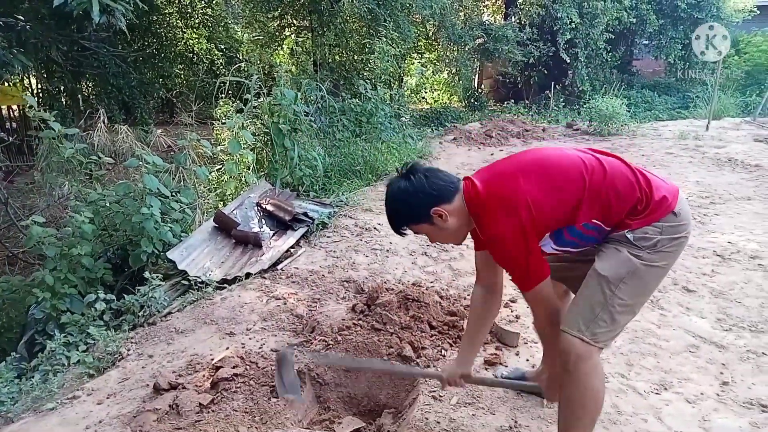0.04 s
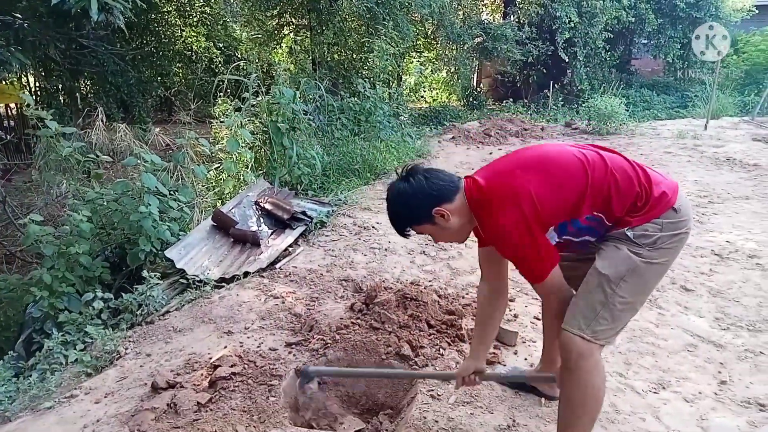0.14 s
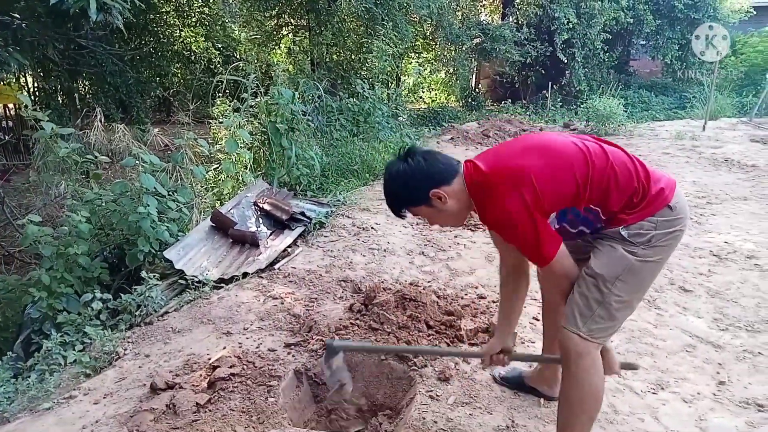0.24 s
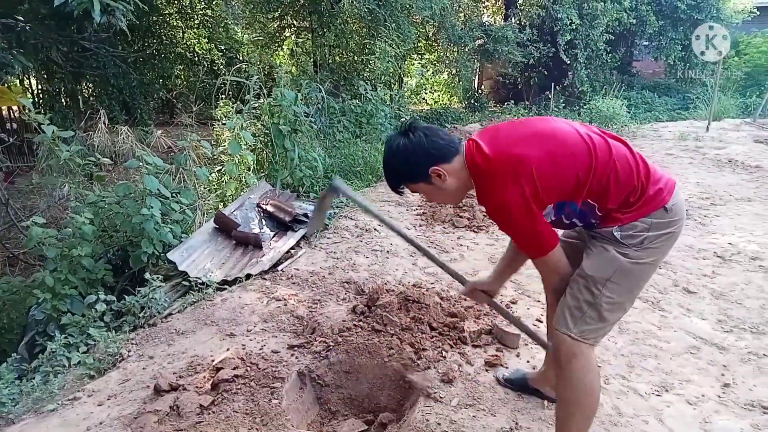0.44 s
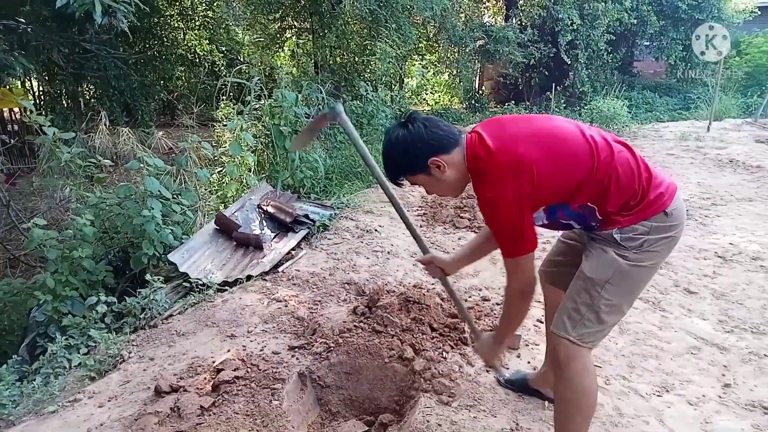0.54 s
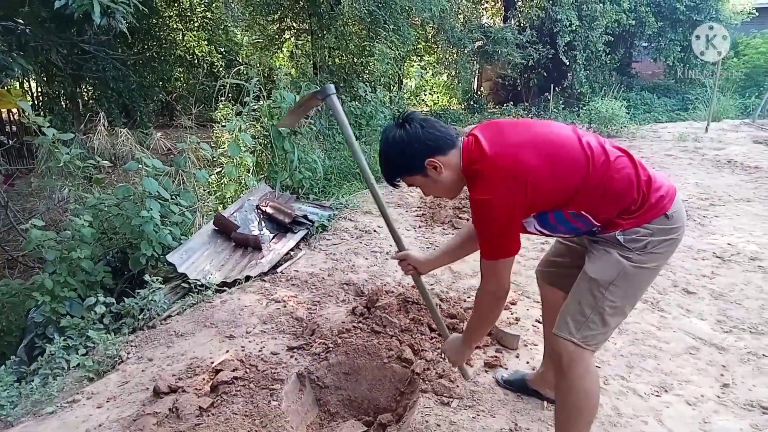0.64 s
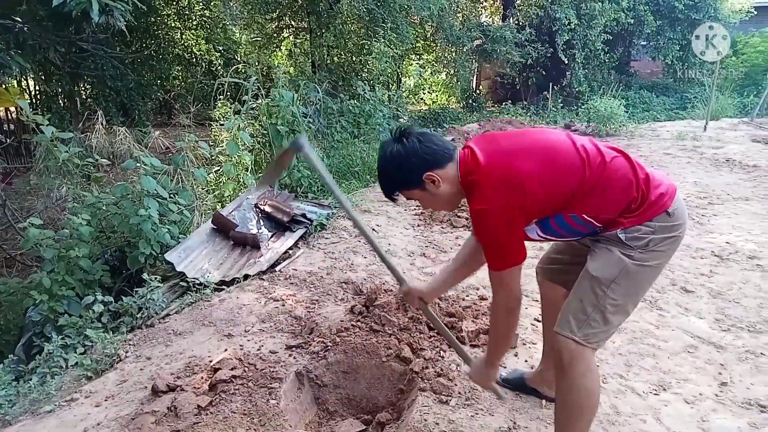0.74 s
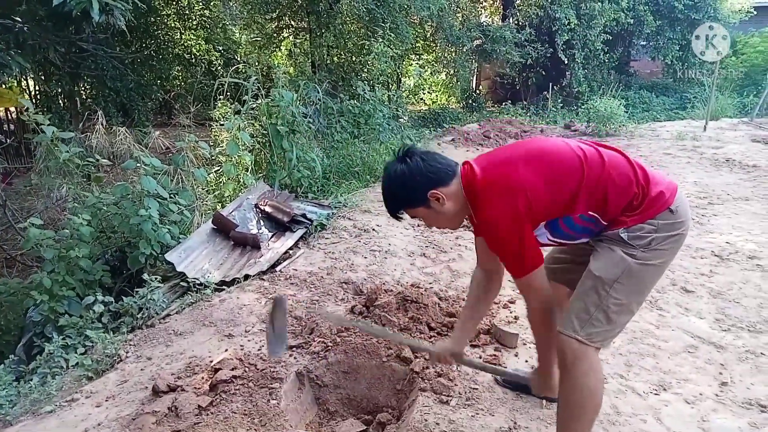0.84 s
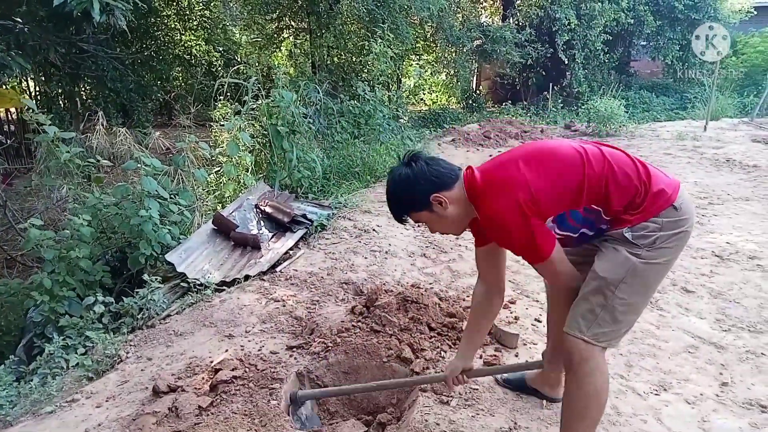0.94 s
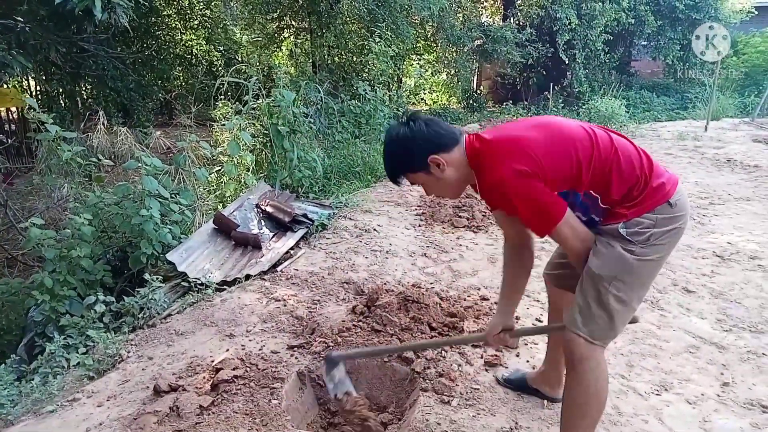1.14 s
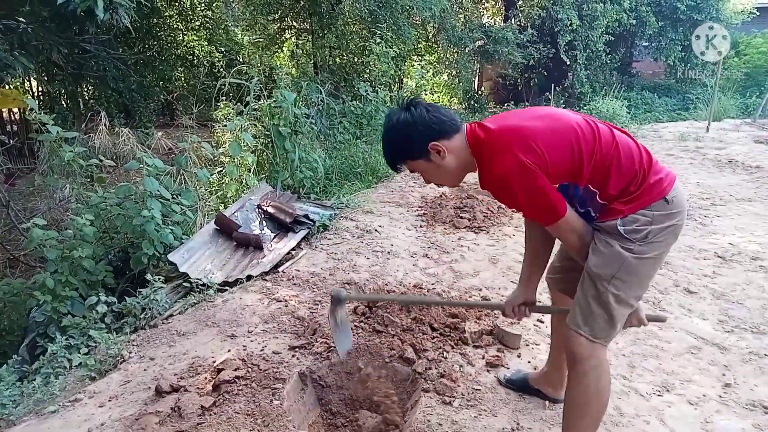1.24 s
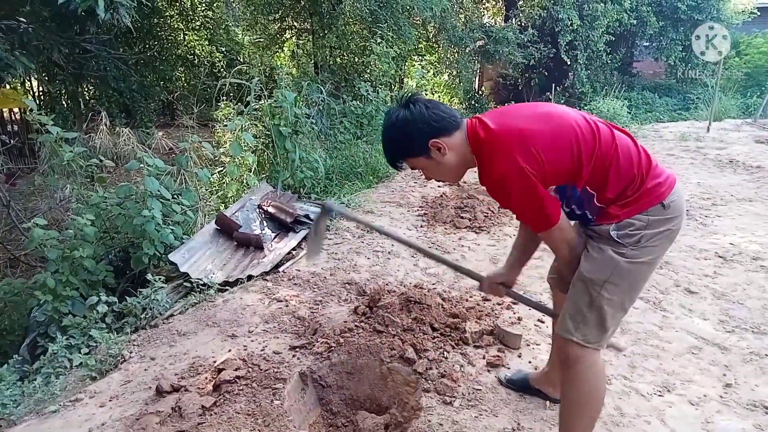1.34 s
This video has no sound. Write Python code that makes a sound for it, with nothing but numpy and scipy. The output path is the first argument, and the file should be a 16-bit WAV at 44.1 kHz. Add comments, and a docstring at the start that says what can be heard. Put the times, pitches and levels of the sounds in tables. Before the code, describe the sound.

A long-handled hoe strikes hard dry ground twice, each blow a sharp clink with a hollow handle knock and crunch; between them crumbs patter and clods clack lightly. Close microphone, quiet open air, faint echo from trees.

```python
"""Hoeing hard dry soil

A hoe chops twice outdoors: damped modes make the steel clink, the handle knock and the ground thud.
Coloured bursts of random grains make the crunching soil, knocking clods and trickling crumbs.
Decaying noise bands give the faint echo of nearby trees, and shaped noise the quiet rumble and hiss."""
import sys
import numpy as np
from scipy import signal
from scipy.io import wavfile
from scipy.ndimage import uniform_filter1d

SR = 44100
rng = np.random.default_rng(int(sys.argv[2]) if len(sys.argv) > 2 else 0)


def dump_mix(stems):
    """Bounce the given channels to the path in sys.argv[1] as a 16-bit WAV at rate SR."""
    frames = np.atleast_2d(stems).T  # one column per channel
    limited = np.clip(frames, -1, 1)  # hard clip at full scale
    pcm = np.round(limited * 32767).astype(np.int16)
    wavfile.write(sys.argv[1], SR, pcm)


N = 61739
T = np.arange(N) / SR

# spectrum of fine grit, shared by crumbling soil and clods [pitch_hz, relative level_db per Hz]
GRIT_SPECTRUM = [(1000, -12.5), (5000, 0.5), (7500, -11), (10000, -1.5), (11700, 1), (13500, -6.5),
                 (15000, -8.5), (16000, -4)]


def amp(db):
    """Decibels to gain."""
    return 10 ** (np.asarray(db) / 20)


def read(points, hz):
    """A curve's value at each frequency, interpolated on a log-frequency axis."""
    f, value = np.transpose(points)
    return np.interp(np.log(hz + 1), np.log(f + 1), value)


def level(points):
    """Gain over time along a curve of [time_s, level_db]."""
    return amp(np.interp(T, *np.transpose(points)))


def colour(x, points, size=4096):
    """Causal minimum-phase filter of unit energy with the given spectrum."""
    log_gain = np.log(amp(read(points, abs(np.fft.fftfreq(size, 1 / SR)))))
    response = np.exp(np.conj(signal.hilbert(log_gain)))
    kernel = np.fft.ifft(response).real[:size // 2]
    return signal.fftconvolve(x, kernel / np.linalg.norm(kernel))[:N]


def grains(per_s=9000, spread_db=3, size=256):
    """Random tiny fractures of uneven size, evened to a steady power over `size` samples."""
    strength = amp(spread_db * np.minimum(rng.exponential(1, N), 4))
    struck = rng.random(N) < per_s / SR
    x = rng.standard_normal(N) * strength * struck
    return x / np.sqrt(abs(uniform_filter1d(x ** 2, size)) + 1e-9)


def burst(start, rise, hold, fall):
    """Envelope: straight rise, exponential release from `hold` seconds after the start."""
    t = T - start
    return np.clip(t / rise, 0, 1) * np.exp(-np.maximum(t - hold, 0) / fall)


def ring(start, modes, rise, pitch=1, length=1):
    """Damped modes set going by one blow, in alternating polarity."""
    t = np.maximum(T - start, 0)
    total = np.zeros(N)
    for k, (hz, db, t60) in enumerate(modes):
        decay = amp(db - 60 * t / (t60 * length))
        total += (-1) ** k * decay * np.sin(2 * np.pi * hz * pitch * t)
    return (1 - np.exp(-t / rise)) * total


def crumbling(rows, spectrum, rise, fall):
    """Soil breaks in bursts of coarse grains with fine grit on top."""
    body = sum(amp(db) * burst(s, rise, hold, fall) for s, hold, db, grit_db in rows)
    fine = sum(amp(grit_db) * burst(s, rise, hold, fall) for s, hold, db, grit_db in rows)
    grit = grains(per_s=20000, spread_db=1)
    return colour(body * grains(), spectrum) + colour(fine * grit, GRIT_SPECTRUM)


def open_air(air_db=-58):
    """Steady outdoor noise, with the wavering low rumble of air on the microphone."""
    # outdoor air [pitch_hz, relative level_db per Hz]
    air_spectrum = [(20, -31), (60, -17), (110, -5.5), (170, -2), (230, -14.5), (340, -11.5), (450, -9),
                    (600, -16.5), (900, -13.5), (1300, -20.5), (2200, -22.5), (3500, -20), (5600, -28.5),
                    (6700, -23), (7600, -35.5), (10000, -32.5), (12200, -26), (14000, -35), (16000, -35)]
    # rumble [pitch_hz, relative level_db per Hz]
    rumble_spectrum = [(20, -10), (40, -17), (65, 0), (100, -10.5), (170, -7.5), (400, -36), (2000, -73)]
    # rise and fall of the rumble [time_s, level_db]
    rumble_level = [(0, -48.5), (.11, -78), (.22, -65), (.4, -54), (.56, -59.5), (.74, -67), (.82, -56.5),
                    (1.06, -53.5), (1.14, -74), (1.27, -49.5), (1.4, -55)]
    air = amp(air_db) * colour(rng.standard_normal(N), air_spectrum)
    return air + level(rumble_level) * colour(rng.standard_normal(N), rumble_spectrum)


def loose_soil(rise_s=0.00021):
    """Pebbles tick down in short grain bursts while dry soil slides as a continuous grain stream."""
    # small stones and crumbs landing [start_s, level_db, decay_s]
    pebbles = [(0.1348, -46.5, 0.0114), (.1805, -44, 0.0025), (0.287, -34, 0.0026), (.3050, -27.5, 0.0014),
               (.3380, -38, 0.0053), (0.3732, -37, 0.005), (0.462, -43, 0.0044), (.7170, -49.5, 0.0033),
               (1.252, -29.5, 0.0052)]
    # colour of the landings [pitch_hz, relative level_db per Hz]
    pebble_spectrum = [(300, -30), (1500, -21), (3100, 11), (4200, 0.5), (6000, -29), (12000, -29),
                       (16000, -30)]
    # soil sliding and scraping on the blade [time_s, level_db]
    slide_level = [(.12, -108), (.15, -56), (.23, -56.5), (.31, -52), (.42, -50), (.51, -49.5), (.58, -62),
                   (.64, -65), (.75, -67), (.84, -78.5), (1.12, -58.5), (1.24, -44.5), (1.31, -65),
                   (1.4, -72)]
    # colour of the scraping [pitch_hz, relative level_db per Hz]
    scrape_spectrum = [(200, -12.5), (1800, -21.5), (3300, 2), (4200, -3), (5200, -10.5), (8000, -18.5),
                       (11500, -13.5), (16000, -24)]
    ticks = sum(amp(db) * burst(s, rise_s, rise_s, fall) for s, db, fall in pebbles)
    slide = level(slide_level) * grains()
    return colour(ticks * grains(), pebble_spectrum) + colour(slide, scrape_spectrum)


def trees(x, onset_s=0.0052):
    """Diffuse echo scattered by foliage, each band dying at its own speed."""
    # strength of the echo [pitch_hz, level_db]
    echo_level = [(100, -33), (600, -25.5), (1000, -27), (2000, -16), (3400, -21.5), (6000, -9.5),
                  (11000, -18.5), (16000, -21)]
    # time to fall by 60 dB [pitch_hz, t60_s]
    echo_decay = [(200, 0.87), (1000, 1), (3400, 0.73), (7000, 0.41), (15000, 0.25)]
    hz, t, bands = signal.stft(rng.standard_normal(SR), SR, nperseg=256)
    t60 = read(echo_decay, hz)[:, None]
    decay = amp(read(echo_level, hz)[:, None] - 60 * t / t60)
    unit_energy = np.sqrt(2 * np.log(1000) / (t60 * SR))  # long decays gain no extra energy
    tail = signal.istft(bands * decay * unit_energy, SR, nperseg=256)[1][:SR]
    tail = tail * np.minimum(T[:SR] / onset_s, 1)
    return signal.fftconvolve(x, tail)[:N]


def spills():
    """Showers of loose earth: soft-edged bursts of coarse grains and grit."""
    # each shower [start_s, length_s, level_db, grit_db]
    showers = [(.185, 0.022, -60, -61), (.372, 0.013, -50, -51), (.658, 0.018, -53.5, -55),
               (.70, 0.047, -70, -61.5), (.862, 0.028, -47, -52.5), (.90, 0.041, -60, -60.5),
               (.935, 0.079, -48.5, -59), (.99, 0.046, -56.5, -67)]
    # colour of the coarse grains [pitch_hz, relative level_db per Hz]
    spill_spectrum = [(80, 2), (250, -9), (900, 0.5), (1600, -2), (4300, -3.5), (5500, -13.5), (9000, -13),
                      (16000, -11)]
    return crumbling(showers, spill_spectrum, rise=0.011, fall=0.02)  # seconds


def rubs(width_hz=140, rise_s=0.004, fall_s=0.0055):
    """Stick-slip grains excite a narrow resonance."""
    # short dry scrapes of the hoe against the soil [start_s, length_s, pitch_hz, level_db]
    scrapes = [(0.2, 0.023, 850, -57), (0.335, 0.0081, 2230, -46), (0.421, 0.02, 1690, -52),
               (0.459, 0.0078, 3630, -49), (0.916, 0.014, 1800, -55.5), (0.982, .02, 2670, -46),
               (1.222, 0.022, 1660, -47.5)]
    radius = np.exp(-np.pi * width_hz / SR)
    out = np.zeros(N)
    for s, length, hz, db in scrapes:
        pole = radius * np.exp(2j * np.pi * hz / SR)
        tone = signal.lfilter([1], [1, -pole], grains()).imag
        out += amp(db) * burst(s, rise_s, length, fall_s) * tone / tone.std()
    return out


def pushes(rise_s=0.0029, fall_s=0.0016):
    """Muffled grinding of soil that is pressed aside."""
    # packed earth giving way under the hoe [start_s, length_s, level_db]
    presses = [(0.233, 0.014, -38), (0.254, 0.023, -36), (0.848, 0.0098, -35.5), (0.943, 0.024, -50)]
    # its dull colour [pitch_hz, relative level_db per Hz]
    push_spectrum = [(50, -11), (170, -4), (300, 0), (420, -3), (580, -9), (800, 3.5), (1100, -1.5),
                     (1500, -25), (4000, -32)]
    flow = sum(amp(db) * burst(s, rise_s, hold, fall_s) for s, hold, db in presses)
    return colour(flow * grains(), push_spectrum)


def crunches():
    """Soil breaks under the blade in quick bursts of coarse grains and grit."""
    # each break [start_s, length_s, crunch level_db, grit_db]
    breaks = [(.2348, 0.01487, -32, -37), (.2530, 0.0046, -16.5, -25.5), (.2600, 0.0061, -27, -32.5),
              (.2672, 0.0033, -24.5, -27.5), (.2740, 0.032, -39.5, -55), (.3712, 0.0047, -35, -44),
              (1.0925, 0.0012, -20.5, -23.5), (1.0950, 0.0051, -20.5, -25), (1.1036, 0.0016, -23.5, -23),
              (1.2362, 0.00086, -33, -31.5), (1.2512, 0.0033, -42, -40.5)]
    # colour of the coarse grains [pitch_hz, relative level_db per Hz]
    crunch_spectrum = [(60, -25), (250, -2), (420, -15.5), (650, -15.5), (1000, 1.5), (1900, -1),
                       (2700, -1), (3900, 1.5), (5500, -13), (7500, -24.5), (16000, -27)]
    return crumbling(breaks, crunch_spectrum, rise=0.0016, fall=0.0025)  # seconds


def blade():
    """Each blow cracks the crust, rings the steel, knocks the handle and thuds into the ground."""
    # blade meeting hard ground
    # [start_s, steel ring_db, hollow knock_db, thud_db, crust crack_db, ring pitch ratio, ring length ratio]
    blows = [(0.2527, -4, -23, -47, 1.5, 0.97, 0.87), (0.254, -21, -14, -40, -37, 0.97, 1.2),
             (0.2651, -15, -18, -42, -5.5, 0.93, 0.86), (0.2768, -46, -47, -23, -36, 0.8, 1.0),
             (1.0943, -0.5, -9.5, -19.5, -12, 0.97, 1.07), (1.1032, -12, -3.5, -21, -16, 0.86, 1.1)]
    # blade damped by soil, before each blow's ratios [pitch_hz, relative level_db, t60_s]
    steel_modes = [(1790, -15, 0.0162), (2133, -14.5, 0.0092), (2844, -14, 0.034), (3463, -6, 0.013),
                   (3650, -4.5, 0.017), (4600, -41, 0.011), (5280, -17.5, 0.012), (5716, -15, 0.011),
                   (10970, -20.5, 0.0073)]
    # hollow knock of socket and handle [pitch_hz, relative level_db, t60_s]
    handle_modes = [(919, -7, 0.019), (1066, -4, 0.01895), (1280, -9, .018)]
    # dry crust splitting [pitch_hz, relative level_db, t60_s]
    crust_modes = [(2630, -3, 0.0057), (3783, -9.5, 0.0086)]
    thud_modes = [(176, 0, 0.012)]  # pitch_hz, level_db, t60_s
    ring_rise_s, knock_rise_s, crack_rise_s = 0.00053, 0.00078, 0.00022
    knock_lag_s = 0.0004
    out = np.zeros(N)
    for s, ring_db, knock_db, thud_db, crack_db, pitch, length in blows:
        out += amp(ring_db) * ring(s, steel_modes, ring_rise_s, pitch, length)
        out += amp(knock_db) * ring(s + knock_lag_s, handle_modes, knock_rise_s)
        out += amp(thud_db) * ring(s, thud_modes, knock_rise_s)
        out += amp(crack_db) * ring(s, crust_modes, crack_rise_s)
    return out


def spray(rise_s=0.00194, tick_db=-10):
    """A dying patter of crumbs after each chop, with sparser grains ticking out."""
    # crumbs thrown up by each chop patter down [start_s, level_db, decay_s]
    sprays = [(0.277, -43, .065), (1.107, -39, 0.11)]
    # colour of the patter [pitch_hz, relative level_db per Hz]
    spray_spectrum = [(80, -44), (300, -7.5), (650, -12), (950, 3), (1300, 0), (1700, -1), (2400, -5.5),
                      (3400, 3.5), (4200, -5), (5000, -10.5), (7500, -15.5), (12000, -28), (16000, -30)]
    flow = sum(amp(db) * burst(s, rise_s, rise_s, fall) for s, db, fall in sprays)
    crumbs = grains(per_s=3500, spread_db=1, size=768)
    ticks = amp(tick_db) * grains(per_s=220, spread_db=0, size=2048)
    return colour(flow * (crumbs + ticks), spray_spectrum)


def clods(rise_s=0.00035):
    """Lumps of earth clack, thump and shed grit, as three colours of grain under shared envelopes."""
    # loose clods knocking against the hoe [start_s, clack level_db, decay_s, dull thump_db, grit_db]
    knocks = [(0.849, -37.5, 0.0074, -33.5, -47), (0.8555, -26, 0.0021, -33.5, -33.5),
              (.8620, -23, 0.00256, -31, -31.5), (0.8726, -29.5, 0.0012, -60, -48),
              (0.9715, -29.5, 0.0054, -37, -60), (0.9933, -40, 0.00204, -48, -41),
              (0.996, -41, 0.0039, -65.5, -66)]
    # colour of the clack [pitch_hz, relative level_db per Hz]
    clack_spectrum = [(100, -64), (550, -10.5), (950, 7.5), (1400, -6), (1850, 4.5), (2800, -5.5),
                      (3600, -2.5), (4300, 7.5), (5000, -17.5), (6200, -17.5), (8000, -6.5), (16000, -31)]
    # colour of the dull thump [pitch_hz, relative level_db per Hz]
    thump_spectrum = [(50, -10), (200, -5), (440, -11.5), (600, -11), (950, 2.5), (1600, -14), (6000, -63)]
    clack, thump, fine = np.zeros((3, N))
    for s, db, fall, thump_db, grit_db in knocks:
        envelope = burst(s, rise_s, rise_s, fall)
        clack += amp(db) * envelope
        thump += amp(thump_db) * envelope
        fine += amp(grit_db) * envelope
    coarse = colour(clack * grains(), clack_spectrum) + colour(thump * grains(), thump_spectrum)
    return coarse + colour(fine * grains(), GRIT_SPECTRUM)


def taps(rise_s=0.0002, pivot_hz=1460):
    """Light taps ring damped modes; harder lumps bring out the higher ones."""
    # the hoe rakes lumps aside [start_s, level_db, brightness in dB per octave]
    touches = [(.8500, -32, -4.5), (.8555, -32.5, -5), (.8621, -20, -1), (0.972, -30.5, -1),
               (0.9916, -32, 6), (1.2521, -34.5, 4.5)]
    # ring of a light tap, before the brightness tilt [pitch_hz, relative level_db, t60_s]
    tap_modes = [(460, -13.5, 0.051), (1000, -6, 0.013), (1802, -5.5, 0.029), (4250, -4, 0.012),
                 (8000, -33, 0.0055)]
    out = np.zeros(N)
    for s, db, tilt_db in touches:
        tilted = [(hz, mode_db + tilt_db * np.log2(hz / pivot_hz), t60) for hz, mode_db, t60 in tap_modes]
        out += amp(db) * ring(s, tilted, rise_s)
    return out


def scene():
    """Chops, clods and spilling earth, with their echo and the open air."""
    # brief dip of loose soil, echo and air around the second chop [time_s, level_db]
    dip = [(1.066, 0), (1.078, -20.5), (1.088, -7), (1.096, -0.5)]
    hits = blade() + crunches() + clods() + taps() + pushes()
    soil = loose_soil() + spray() + rubs() + spills()
    background = soil + trees(hits + soil) + open_air()
    return (hits + level(dip) * background)[None]


def record(dry, low_cut_hz=55, edge_hz=15450):
    """The microphone loses the deepest bass; then the recorder's band limit removes the top."""
    low_cut = signal.butter(2, low_cut_hz, "highpass", fs=SR, output="sos")
    thin = signal.sosfilt(low_cut, dry)
    band_limit = signal.firwin(255, edge_hz, window=("kaiser", 8), fs=SR)
    return signal.oaconvolve(thin, band_limit[None], "same")


dry = scene()
out = record(dry)
dump_mix(out)
```